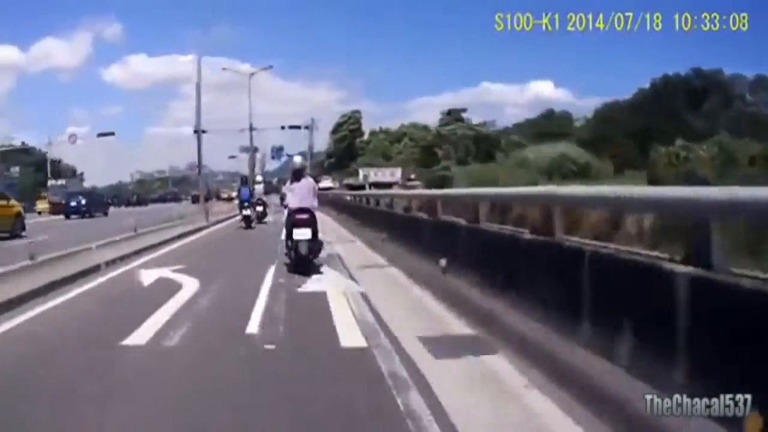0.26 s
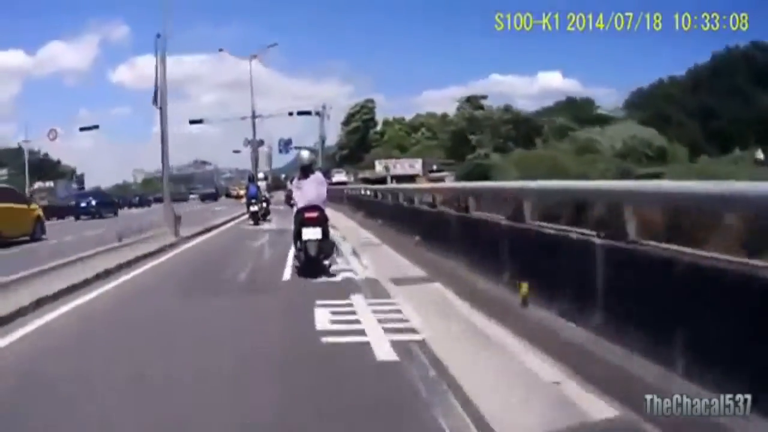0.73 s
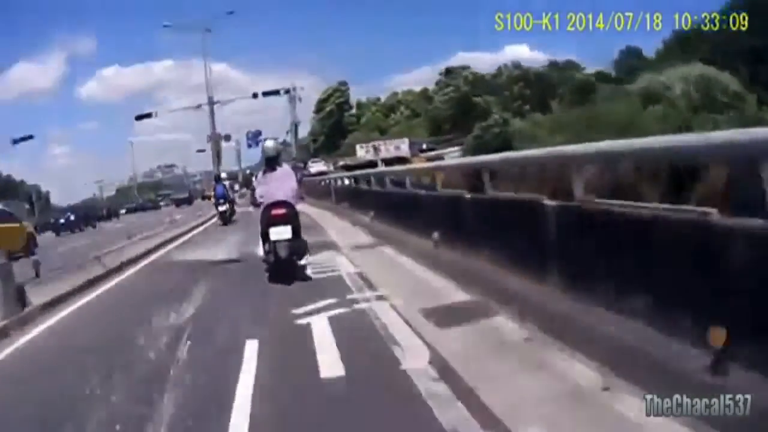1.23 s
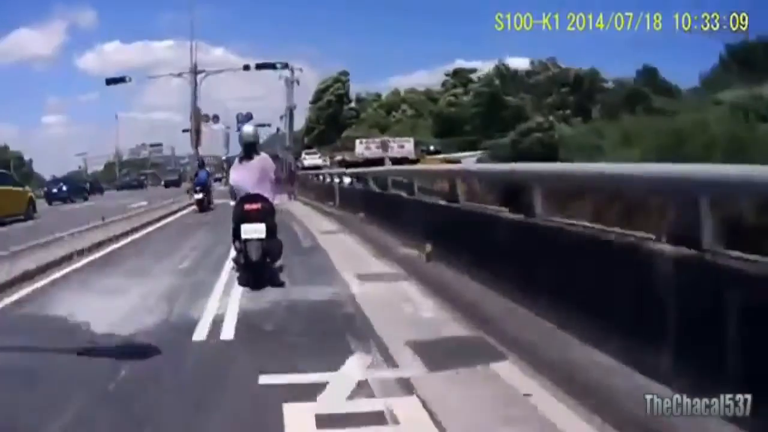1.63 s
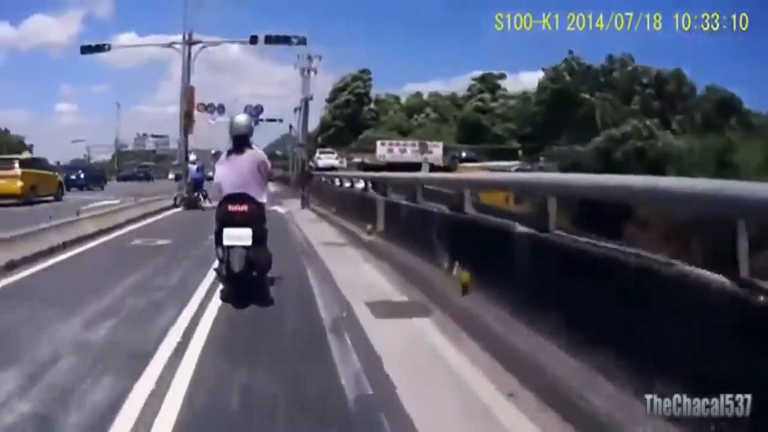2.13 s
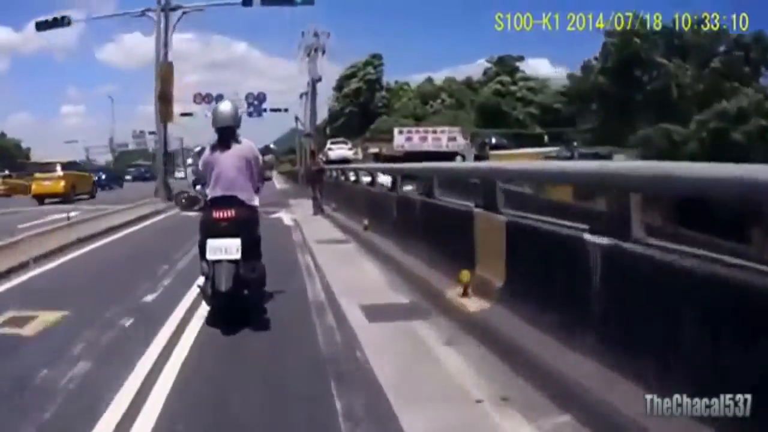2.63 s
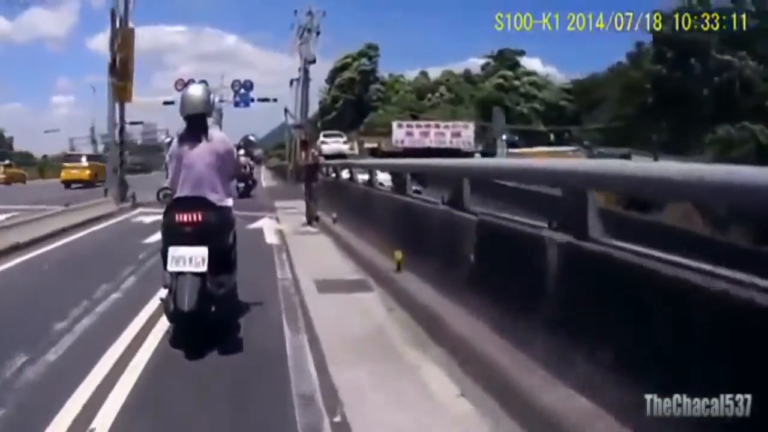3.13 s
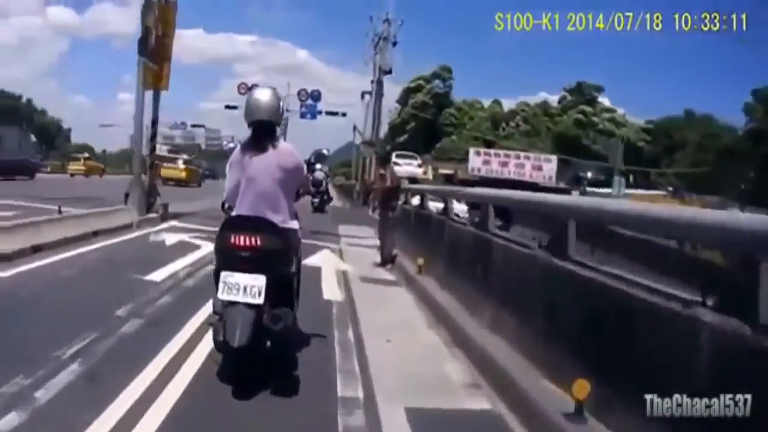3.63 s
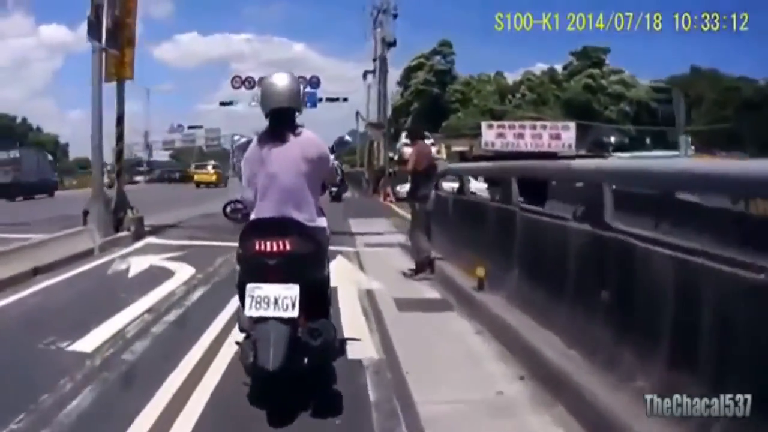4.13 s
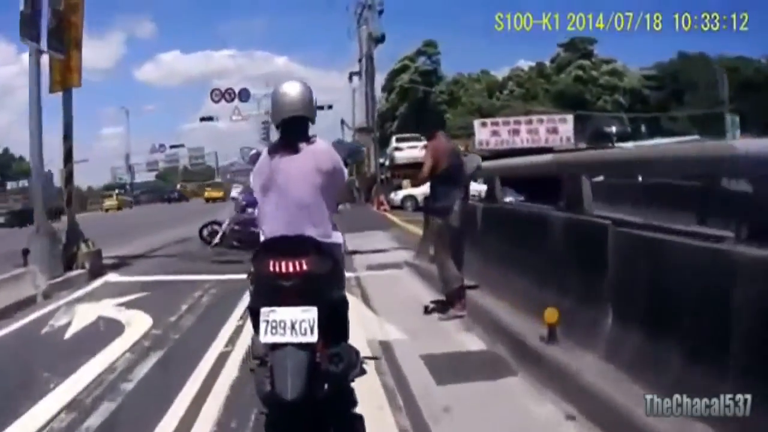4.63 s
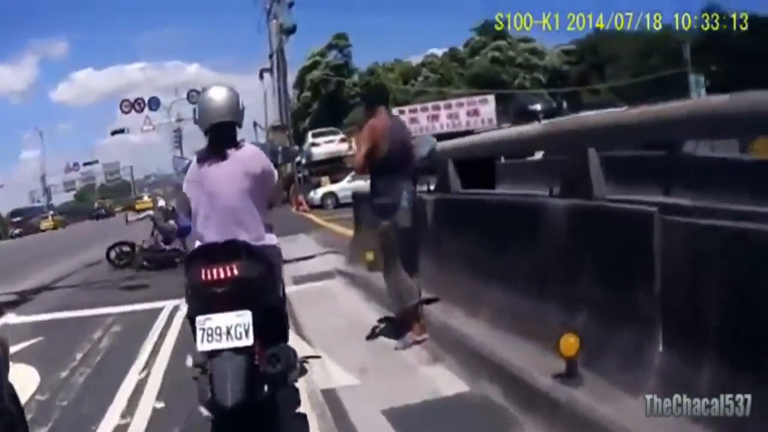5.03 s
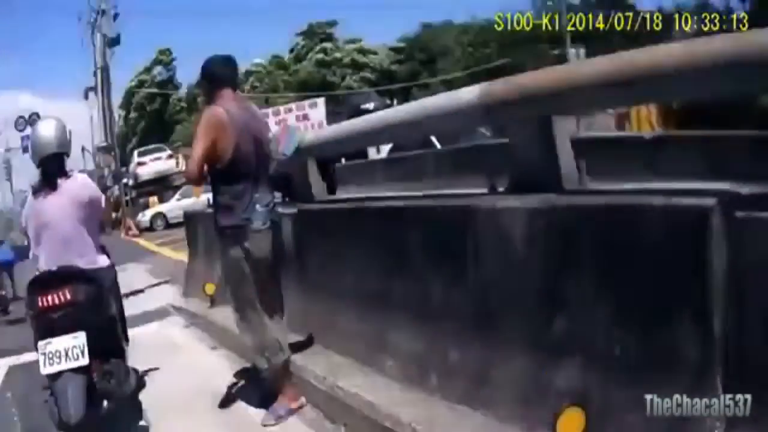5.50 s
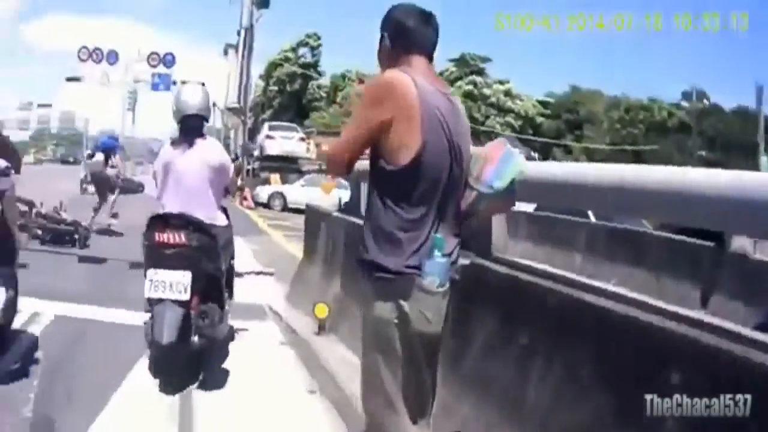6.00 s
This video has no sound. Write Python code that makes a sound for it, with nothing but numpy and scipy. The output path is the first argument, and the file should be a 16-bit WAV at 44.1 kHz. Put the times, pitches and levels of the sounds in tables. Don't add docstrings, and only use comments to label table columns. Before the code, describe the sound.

Dull, bass-heavy scooter hum and road rumble slow over six seconds, loose plastic knocking, brakes hissing softly before a deep trembling near-stop.

```python
import sys
import numpy as np
from scipy import signal
from scipy.fft import next_fast_len
from scipy.io import wavfile

SR = 44100
rng = np.random.default_rng(int(sys.argv[2]) if len(sys.argv) > 2 else 0)


def invert_db(x):
    u = np.asarray(x, float) / 20
    return 10 ** u


def to_wav(s):
    ch = np.atleast_2d(s).T
    pcm = np.round(np.clip(ch, -1, 1) * 32767)
    wavfile.write(sys.argv[1], SR, pcm.astype(np.int16))


N = 276056


def column(rows):
    s, *cols = np.transpose(rows)
    return [np.interp(np.arange(N) / SR, s, c) for c in cols]


def ramp(start, end):
    return np.clip((np.arange(N) / SR - start) / (end - start), 0, 1)


def evened(x):
    return x / np.sqrt(np.mean(x ** 2) + 1e-20)


def wander(per_s):
    b, a = signal.butter(2, per_s, fs=SR)
    return evened(signal.lfilter(b, a, rng.standard_normal(N)))


def resonate(x, hz, width):
    turn = np.exp(2j * np.pi * np.cumsum(hz * np.ones(len(x))) / SR)
    r = np.exp(-np.pi * width * 1.55 / SR)
    smooth = signal.lfilter([(1 - r) ** 2], [1, -2 * r, r * r], x / turn)
    return 2 * (turn * smooth).real


def through(x, modes, patchy_db=0, per_s=8):
    out = 0
    for k, (hz, width, db) in enumerate(modes):
        patches = patchy_db * wander(per_s) if patchy_db else 0
        out = out + (-1) ** k * invert_db(db + patches) * resonate(x, hz, width)
    return out


def tone(hz, modes, rough):
    power = sum(invert_db(2 * db) / (1 + (2 * (hz - mode_hz) / width) ** 4) for mode_hz, width, db in modes)
    return np.sqrt(2 * power) * (1 + rough * wander(12)) * np.sin(2 * np.pi * np.cumsum(hz) / SR)


def wake():
    return invert_db(-19.5 * (1 - ramp(0.04, 0.055)))


# t/s, crank f/Hz, final gear mesh f/Hz
SPEED = [(0.0, 92.97, 362), (0.12, 95.02, 366), (0.25, 89.93, 375), (0.4, 80.55, 373), (0.6, 76.98, 366),
         (1.2, 74.78, 349), (1.6, 73.4, 330), (2.0, 70.3, 304), (2.4, 66.77, 270), (2.8, 63.16, 221),
         (3.2, 60, 178), (3.4, 57.58, 155), (3.8, 54.18, 131), (4.2, 51.6, 113.5), (4.4, 49.7, 96),
         (4.8, 41.47, 78), (5.2, 36.8, 66), (6.26, 32, 42)]
# f/Hz, width/Hz, level/dB
FIRST_ORDER = [(90.16, 10, -12.5), (79.95, 9, -12.5), (68.9, 2.9, -26.5), (60, 8.9, -30)]
SECOND_ORDER = [(180, 16, -26), (151.7, 21, -27), (135, 4.3, -28.5), (113.5, 11, -24), (102.5, 5, -16.5),
                (97.33, 5, -9.5), (86.5, 7, -16.5), (80.1, 7, -17.5), (71, 8, -31)]
THIRD_ORDER = [(289.2, 20, -26.5), (266, 15, -34.5)]


def engine():
    hz = column(SPEED)[0]
    odd = tone(hz, FIRST_ORDER, rough=0.061) + tone(3 * hz, THIRD_ORDER, rough=0.075)
    return wake() * odd + tone(2 * hz, SECOND_ORDER, rough=0.12)


# f/Hz, width/Hz, level/dB
SHAFT_ORDER = [(96.3, 6, -15), (80.6, 7.4, -27.5), (81, 8.8, -24)]
MESH_ORDER = [(342.8, 38, -37.5), (269.4, 20, -23.5), (238, 23, -29), (145, 28, -26.5), (120.2, 16, -22.5),
              (89.05, 6, -30.5), (69, 6.4, -38.5), (49.7, 12, -40.5)]
HALF_ORDER = [(154.6, 39, -36.5), (137, 20, -44), (100, 14, -47), (60, 14, -49.5)]
MESH_PER_SHAFT_TURN = 3.84
TEETH, RUNOUT, RUNOUT_TURN = 38, 0.17, 0.3


def drive():
    mesh_hz = column(SPEED)[1]
    shaft = wake() * tone(mesh_hz / MESH_PER_SHAFT_TURN, SHAFT_ORDER, rough=0.3)
    wheel_turns = np.cumsum(mesh_hz) / SR / TEETH
    throb = 1 + RUNOUT * np.cos(2 * np.pi * (wheel_turns + RUNOUT_TURN))
    mesh = throb * tone(mesh_hz, MESH_ORDER, rough=0.28)
    half = tone(mesh_hz / 2, HALF_ORDER, rough=0.35)
    lower = tone(mesh_hz * 4 / 5, [(260, 20, -39)], rough=0.2)
    upper = tone(mesh_hz * 2, [(261, 21, -40)], rough=0.21)
    return shaft + mesh + half + lower + upper


TOP_MESH_HZ = 366


def shaking_db(surface_db, top_db, fast_db, knee_hz, slow_db, share):
    mesh_hz = column(SPEED)[1]
    above = np.log2(np.maximum(mesh_hz, knee_hz) / TOP_MESH_HZ)
    below = np.log2(np.minimum(mesh_hz / knee_hz, 1))
    return top_db + fast_db * above + slow_db * below + share * surface_db


# t/s, coarseness level/dB that buzzes the housing, waviness level/dB that rocks the frame
SURFACE = [(0.0, 0.5, -3.5), (0.2, -0.5, -4.5), (0.5, -1, -2), (0.75, -0.5, -3.5), (1.0, 0.5, 0),
           (1.25, 0.5, 3.5), (1.5, -1.5, -2), (1.9, 0.5, -2), (2.2, 2.5, -0.5), (2.6, 0, 4.5),
           (3.1, 2, -1.5), (3.4, 0, 0.5), (3.9, -1, -1.5), (4.3, -0.5, -4.5), (4.6, 1.5, 0.5),
           (4.9, -1.5, -5.5), (5.25, 0, 0), (6.26, 1, 4.5)]
# f/Hz, width/Hz, level/dB
FRAME = [(22, 130, -9), (40.5, 2.9, -1.5), (62, 51, 0.5), (84.2, 3.9, 13.5), (136.4, 8.8, -5)]
FRAME_LOW = [(98.24, 5.7, 0)]
FRAME_HIGH = [(119.1, 8.7, 0)]
# top-speed level/dB, loss per halving/dB, knee mesh f/Hz, loss below knee/dB, surface share/1
RUMBLE_LAW = (-29.5, 1, 113.5, 5.5, 0.3)
LOW_LAW = (-28.5, -2.5, 144, 5.5, 1.4)
HIGH_LAW = (-26.5, -1, 211, 5.5, 0.44)


def frame():
    waviness_db = column(SURFACE)[1]
    shake = rng.standard_normal(N)
    out = 0
    for law, modes in [(RUMBLE_LAW, FRAME), (LOW_LAW, FRAME_LOW), (HIGH_LAW, FRAME_HIGH)]:
        out = out + invert_db(shaking_db(waviness_db, *law)) * evened(through(shake, modes))
    return out


# f/Hz, width/Hz, level/dB
BODY = [(256.4, 50, 2.5), (362, 44, -9), (430, 37.8, -3), (530, 32, -7.5), (676.4, 66, -11)]
BUZZ = [(827, 61, 3.5), (946, 61, -1.5), (1023, 128, -6)]
WHINE = [(1370, 71, 3), (1723, 91, -5), (2013, 190, -6.5), (2327, 250, -13.5)]
FIZZ = [(2810, 280, 1), (3673, 190, 0), (4060, 300, -3), (4940, 720, -1)]
BODY_LAW = (-33.5, 4.28, 193.5, 7, 1.6)
BUZZ_LAW = (-41, 3, 147.5, 5.5, 0.26)
WHINE_LAW = (-48, 21.5, 283.5, 3.5, 0.5)
FIZZ_LAW = (-61.5, 22.5, 287, 1.5, 0.4)


def road():
    coarseness_db = column(SURFACE)[0]
    bumps_db = 0.24 * wander(3.5) + 2.0 * wander(30)
    shake = rng.standard_normal(N)
    layers = [(BODY_LAW, BODY, 0.9), (BUZZ_LAW, BUZZ, 0.4), (WHINE_LAW, WHINE, 0.44), (FIZZ_LAW, FIZZ, 0.66)]
    out = 0
    for law, modes, bump_share in layers:
        level_db = shaking_db(coarseness_db, *law) + bump_share * bumps_db
        out = out + invert_db(level_db) * evened(through(shake, modes, patchy_db=1.62, per_s=11))
    return out


# t/s, ring level/dB, bright click level/dB above the ring
KNOCKS = [(0.684, -18, -27.5), (0.829, -22, -23), (2.399, -30, -14), (2.794, -34, -36), (3.594, -45, -28),
          (4.091, -44, -31.5), (4.584, -58.5, -5.5), (5.259, -39.5, -18), (5.816, -45, -23)]
RAPS = [(0.17, -42.5, -16.5), (0.503, -35.5, -21.5), (0.619, -15, -16.5), (2.069, -33, -18),
        (5.614, -39.5, -35.5), (5.706, -40.5, -28)]
TAPS = [(0.943, -38, -21), (1.873, -38.5, -41), (2.721, -34.5, -33.5), (3.664, -42.5, -33.5),
        (4.328, -38.5, -19.5), (4.5025, -43, -5), (4.926, -41, -21), (5.732, -63, -16)]
RATTLES = [(.33, -48, -6.5), (1.04, -54, -1.5), (1.41, -46, -7), (4.42, -51.5, -6), (4.58, -57, -1)]
CLACK = [(5.089, -10, -24)]
REBOUND = [(5.0995, -19, -24)]
# blows, ring f/Hz, length/s, dull click level/dB above the ring
BLOWS = [(KNOCKS, 848, 0.0068, -13.5), (RAPS, 890, 0.0056, -10), (TAPS, 860, 0.0044, 1.5),
         (RATTLES, 830, 0.036, 4.4), (CLACK, 1034, 0.0097, -25), (REBOUND, 920, 0.0095, -10)]
# t/s, level/dB, f/Hz, length/s
THUDS = [
    (2.44, -16, 124.8, 0.088),
    (2.631, -20.5, 100, .1),
    (3.118, -21, 95.6, 0.0514),
    (4.435, -28.5, 288, 0.018),
    (4.435, -35, 489, 0.022),
    (4.483, -32.5, 304, .013),
    (4.483, -34.5, 493.1, .013),
    (5.102, -25.5, 264.3, 0.014),
    (5.104, -32, 430, 0.015),
    (6.205, -21.5, 98.7, .05),
]


def knocks():
    ring, dull, bright = np.zeros((3, N))
    t = np.arange(6000) / SR
    for blows, hz, length, dull_db in BLOWS:
        held = np.clip(t / 0.0007, 0, 1) / (1 + (t / length) ** 6) * np.sin(2 * np.pi * hz * t)
        click = np.exp(-t / (0.54 * length)) * np.clip(t / (0.092 * length), 0, 1)
        for s, db, bright_db in blows:
            start = round(s * SR)
            span = slice(start, start + len(t))
            burst = rng.standard_normal(len(t)) * click
            ring[span] += invert_db(db) * held
            dull[span] += invert_db(db + dull_db) * burst
            bright[span] += invert_db(db + bright_db) * burst
    for s, db, hz, length in THUDS:
        soft = np.arange(round(2 * length * SR)) / SR
        at = max(round((s - length) * SR), 0)
        ring[at:at + len(soft)] += invert_db(db) * np.hanning(len(soft)) * np.sin(2 * np.pi * hz * soft)
    dull_click = invert_db(15.5) * through(dull, WHINE + [(1700, 710, -3.5)])
    bright_click = invert_db(13.0) * through(bright, FIZZ[1:] + [(3200, 1200, -11.5)])
    return ring + dull_click + bright_click


# t/s, pad friction level/dB
BRAKE = [
    (4.199, -69),
    (4.5, -58.5),
    (4.55, -64),
    (4.59, -50),
    (4.779, -57.5),
    (5.08, -54),
    (5.3, -54.5),
    (5.52, -65),
    (5.62, -98),
]
# f/Hz, width/Hz, level/dB
PAD = [(2122, 160, 4), (2370, 270, -13.5), (4100, 530, -10)]


def brake():
    hz = 4926 - 420 * ramp(4.9, 5.55) ** 3
    squeal = [(hz - 260, 230, -2), (hz, 200, 0), (hz + 220, 200, -3)]
    rub = rng.standard_normal(N)
    seated = ramp(4.6, 4.9)
    hiss = through(rub, squeal, patchy_db=4.5, per_s=57)
    hiss = hiss + seated * through(rub, PAD, patchy_db=3.0, per_s=25)
    touch_s = BRAKE[0][0]
    return ramp(touch_s, touch_s + 0.05) * invert_db(column(BRAKE)[0]) * evened(hiss)


def scene():
    return (engine() + drive() + frame() + road() + knocks() + brake())[None]


def low_pass(x):
    return signal.sosfilt(signal.butter(12, 15790, fs=SR, output="sos"), x)


# clock f/Hz, upper level/dB, lower level/dB
MIRRORS = [(3900, -58, -63), (7800, -68, -69), (11700, -71, -72), (15600, -73, -74)]
FAINT_MIRRORS_HZ = [6500, 9100, 10400, 13000, 14300]


def record(dry):
    lowpass = signal.firwin(301, 5350, window=("kaiser", 8), fs=SR)
    dull = signal.oaconvolve(dry, lowpass[None], "same")
    loud = np.clip(dull, -0.4525, 0.4525)
    t = np.arange(N) / SR
    turning = signal.hilbert(loud, next_fast_len(N))[:, :N]
    mirrors = 0
    for hz, up_db, low_db in MIRRORS:
        sidebands = invert_db(up_db) * turning + invert_db(low_db) * turning.conj()
        mirrors = mirrors + (sidebands * np.exp(2j * np.pi * hz * t)).real
    faint = invert_db(-80.5) * loud * sum(np.cos(2 * np.pi * hz * t) for hz in FAINT_MIRRORS_HZ)
    haze = invert_db(-98) + invert_db(-72) * abs(turning) ** 2
    offset = 0.0004
    return low_pass(loud + mirrors + faint + haze * rng.standard_normal(N) + offset)


dry = scene()
out = record(dry)
to_wav(out)
```